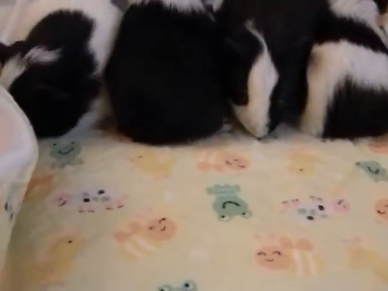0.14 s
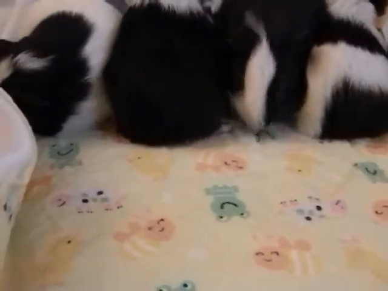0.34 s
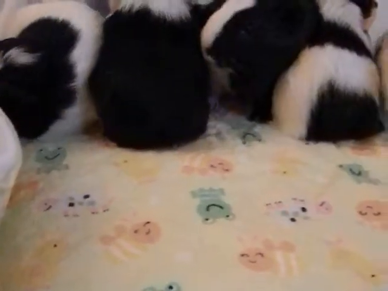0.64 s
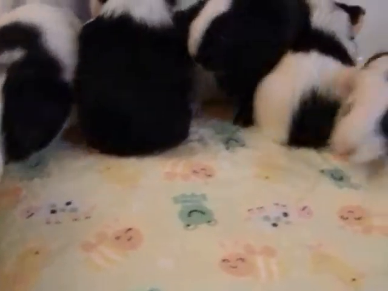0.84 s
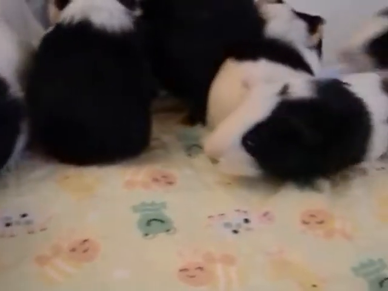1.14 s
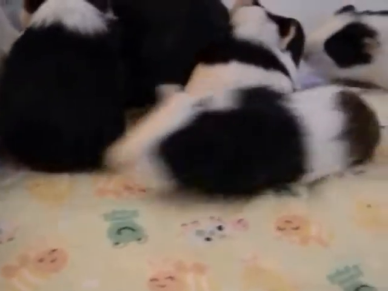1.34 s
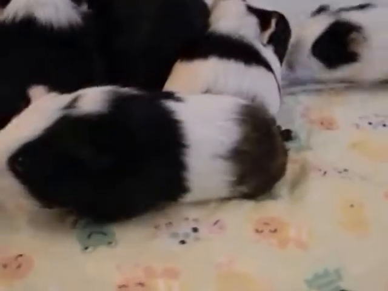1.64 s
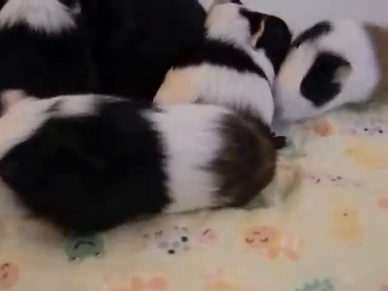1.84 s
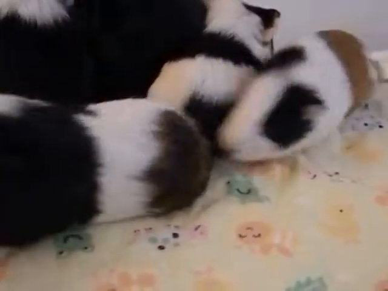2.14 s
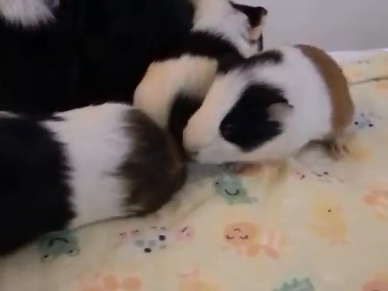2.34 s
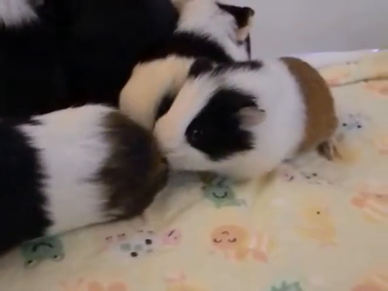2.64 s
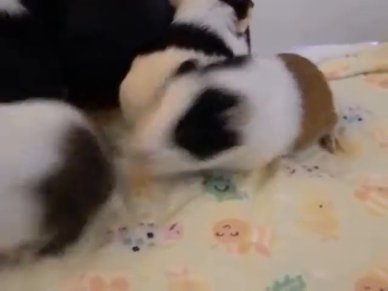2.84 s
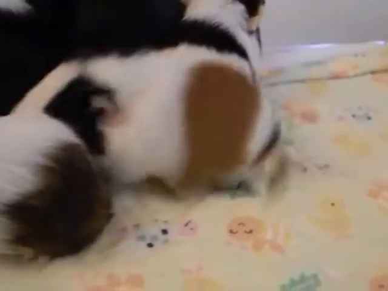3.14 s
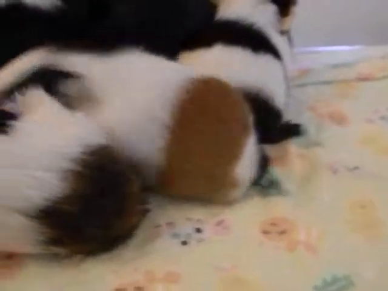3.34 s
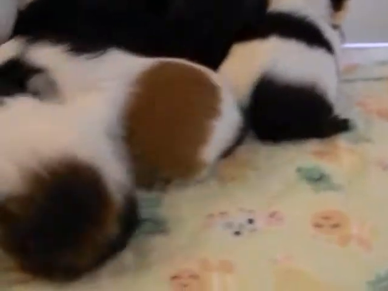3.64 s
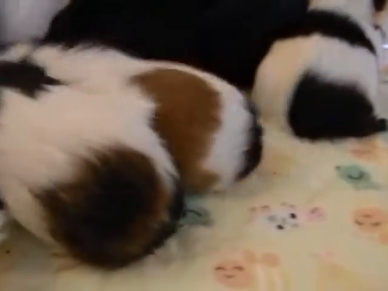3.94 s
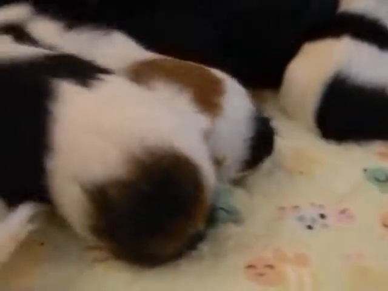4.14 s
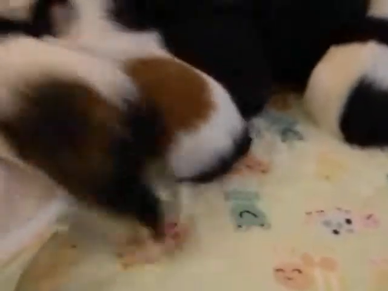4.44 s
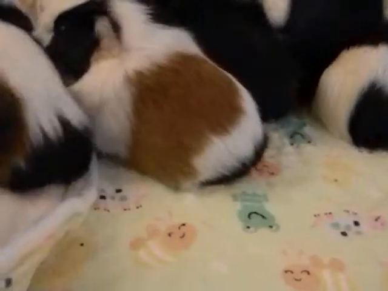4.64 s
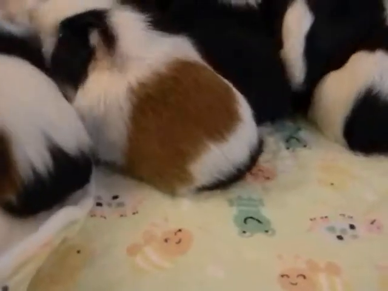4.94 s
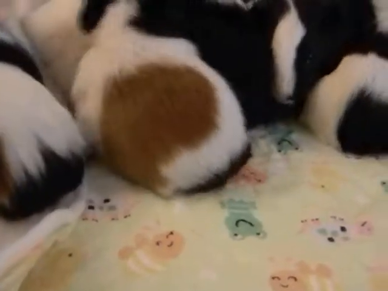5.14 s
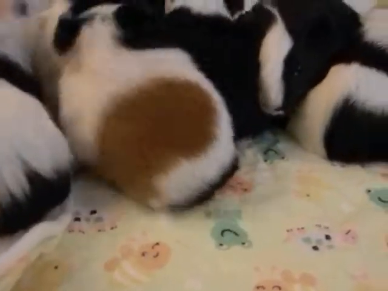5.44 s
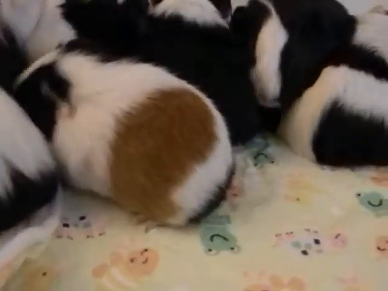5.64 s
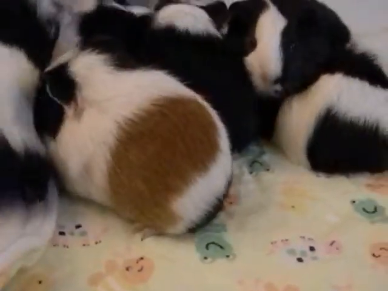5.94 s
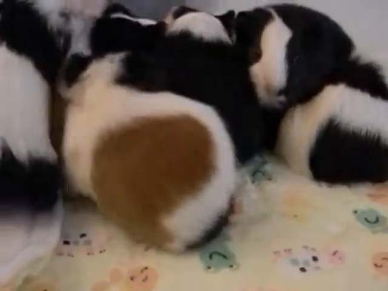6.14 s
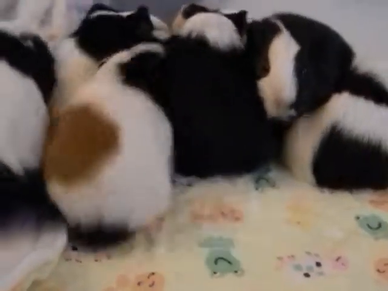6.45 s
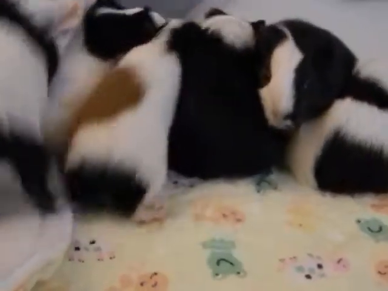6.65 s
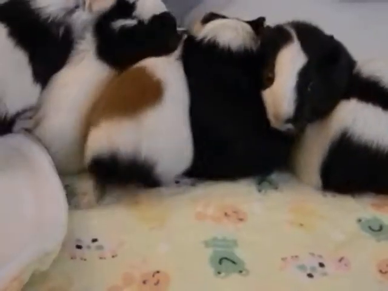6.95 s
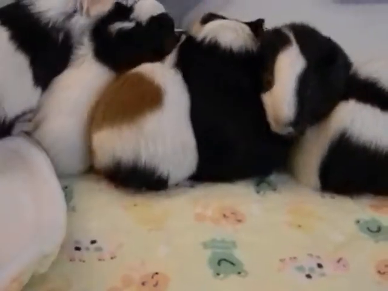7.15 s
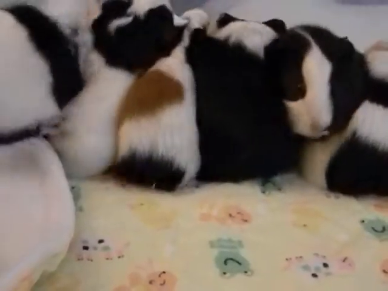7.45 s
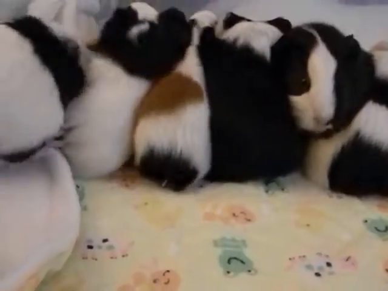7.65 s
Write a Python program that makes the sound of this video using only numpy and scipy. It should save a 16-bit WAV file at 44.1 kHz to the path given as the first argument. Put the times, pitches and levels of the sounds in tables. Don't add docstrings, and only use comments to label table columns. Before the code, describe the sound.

Several young guinea pigs call at once, very near a stereo microphone in a quiet, dry room. Short curved low squeaks overlap quickly, with bright whistles leaping above them. Around two seconds, louder wheeks start low and break upward. Hoarse chuttering from the rest of the litter fills the gaps. Later the calls grow sparser, and rough grumbles, claw ticks, soft foot thuds and fur rustling come forward over a faint rumble.

```python
import sys
import numpy as np
from scipy import signal
from scipy.fft import rfft, irfft, next_fast_len
from scipy.io import wavfile
from scipy.ndimage import uniform_filter1d

SR = 44100
rng = np.random.default_rng(int(sys.argv[2]) if len(sys.argv) > 2 else 0)


def unload_wav(signal):
    wavfile.write(
        sys.argv[1],
        SR,
        np.round(np.clip(np.atleast_2d(signal).T, -1, 1) * 32767).astype(np.int16),
    )


def volts_from_db(level):
    exponent = np.asarray(level, float) / 20
    return 10 ** exponent


N = 343539

# (frequency [Hz], level [dB])
HOARSE_AIR = [(300, -35), (400, 8), (700, -1), (1500, -6), (2400, -6), (4300, -21), (4900, -28.5),
              (5800, -57)]


def near_pups(breath_db=-25.0):
    out = np.zeros(N)
    for rows, overtones_db in calls():
        add(out, *voice(rows, overtones_db, jitter_hz=11.65, shimmer_db=1.5, edge_s=.002))
    low_part = colour(out, [(1500, 3.0), (2500, -45)])
    effort = np.sqrt(abs(uniform_filter1d(low_part ** 2, 200)))
    return out + volts_from_db(breath_db) * effort * evened(colour(rng.standard_normal(N), HOARSE_AIR))


# (time [s], pitch [Hz], level [dB])
WHEEK_LINES = [
    [(1.7, 994, -33), (1.714, 586.6, -22.5), (1.76, 510.5, -18.5), (1.806, 687, -19.5), (1.824, 1397, -25),
     (1.84, 2186, -31.5), (1.857, 2940, -30), (1.888, 3520, -27), (1.935, 3740, -23.5), (1.95, 4080, -20.5)],
    [(2.02, 584, -19.5), (2.072, 530, -14), (2.108, 609, -19.5), (2.149, 775, -26.5), (2.168, 1140, -25.5),
     (2.194, 1321, -24.5), (2.21, 1790, -37)],
    [(2.285, 678, -22), (2.336, 491, -17.5), (2.386, 691, -25), (2.408, 1125, -24.5), (2.433, 2160, -35.5),
     (2.474, 2915, -30), (2.525, 3025, -35), (2.538, 3600, -30.5)],
    [(2.62, 625.6, -20.5), (2.666, 518.4, -16.5), (2.706, 652, -20), (2.75, 858, -27), (2.774, 1570, -32.5),
     (2.804, 2370, -33), (2.838, 2527, -27)],
]
# (time [s], pitch [Hz], level [dB])
ARCH_LINES = [
    [(4.138, 1625, -40), (4.15, 2860, -37), (4.17, 3247, -48.5), (4.19, 2950, -33.5), (4.2, 2620, -40),
     (4.226, 2595, -31.5), (4.24, 2950, -50), (4.254, 2820, -34), (4.26, 2380, -43)],
    [(4.44, 1920, -38), (4.455, 2930, -41.5), (4.51, 3824, -31.5), (4.545, 3020, -36.5), (4.555, 1120, -25)],
    [(.668, 2445, -43), (.69, 2900, -43), (.71, 3010, -42.5), (.738, 2540, -39)],
    [(1.225, 2460, -38), (1.255, 2600, -35.5), (1.27, 3045, -34.5), (1.315, 2986, -36), (1.327, 2500, -39)],
    [(3.468, 1121, -36.5), (3.487, 2695, -41.5), (3.53, 2567, -38), (3.552, 2040, -42)],
    [(3.888, 1495, -35.5), (3.905, 1930, -41), (3.925, 2760, -44), (3.943, 3000, -42.5)],
]
# (time [s], pitch [Hz], level [dB])
CLIMB_LINES = [
    [(.07, 1002, -40), (.088, 2216, -40), (.105, 3020, -36.5), (.13, 3720, -29), (.15, 3891, -27),
     (.175, 3930, -30)],
    [(.383, 904, -31), (.398, 2580, -37), (.425, 3500, -33.5), (.45, 3955, -24), (.476, 4030, -30),
     (.485, 3760, -32.5)],
    [(.925, 2115, -31), (.945, 3130, -39), (.97, 3743, -25.5), (1.0, 3990, -30)],
    [(1.295, 1280, -25), (1.335, 2300, -41), (1.37, 2900, -32.5), (1.392, 3610, -38)],
    [(6.85, 3050, -40.5), (6.888, 3300, -38), (6.912, 3980, -29.5), (6.925, 4000, -38)],
    [(7.29, 1308, -36), (7.31, 3064, -36.5), (7.328, 3834, -32), (7.365, 4270, -31.5), (7.39, 4180, -29),
     (7.412, 4530, -34), (7.419, 4360, -27.5)],
    [(7.695, 2780, -41), (7.72, 2640, -30.5), (7.742, 1967, -39)],
]
# (time [s], pitch [Hz], level [dB])
SHRIEK_LINES = [
    [(3.2, 3110, -40), (3.23, 2978, -46), (3.255, 2580, -36), (3.275, 2340, -37), (3.286, 2000, -47)],
    [(3.355, 1811, -51), (3.372, 2335, -42.5), (3.39, 2770, -32.5), (3.41, 3080, -43), (3.437, 3331, -38)],
]


def calls():
    out = low_calls() + whistles() + slides()
    for lines, overtones_db in ((WHEEK_LINES, -13), (ARCH_LINES, -15.5), (CLIMB_LINES, -22.5), (SHRIEK_LINES, -8.5)):
        out += [(line, overtones_db) for line in lines]
    return out


# (start time [s], length [s], lowest pitch [Hz], level [dB], end pitch [Hz])
DIP_CALLS = [(.3, 0.0757, 549.9, -23, 598), (.82, 0.097, 538.8, -23.5, 607),
             (1.61, 0.078, 543.9, -28.5, 1030), (1.87, 0.061, 524, -26.5, 550),
             (2.41, 0.067, 774.3, -28, 1360), (2.555, 0.082, 552, -22.5, 601.6),
             (3.07, 0.065, 568.8, -24.5, 537), (3.165, 0.11, 554.3, -20.5, 708),
             (3.71, 0.064, 481, -34, 477), (3.78, 0.098, 578, -22.5, 779.7), (4.92, 0.05, 532, -31, 561),
             (5.02, 0.013, 634, -28, 637), (6.3, 0.061, 497.4, -24, 601.4), (7.03, 0.074, 678, -26, 706)]
# (start time [s], length [s], lowest pitch [Hz], level [dB], end pitch [Hz])
SAG_CALLS = [(0, 0.083, 531, -24, 722.2), (.14, 0.1, 492, -25.5, 623), (.44, 0.048, 760, -29.5, 719),
             (.53, 0.052, 492, -27.5, 613), (.69, 0.041, 561, -30.5, 570), (.9, 0.12, 569.4, -25, 788.4),
             (1.12, 0.1645, 510.3, -23, 595.5), (1.438, 0.076, 533.5, -27.5, 553.8),
             (2.845, 0.12, 532.4, -22.5, 552), (2.92, 0.1298, 528, -19.5, 1066),
             (3.37, 0.1, 475.4, -23.5, 681.4), (3.94, 0.1, 555, -32.5, 545),
             (4.055, 0.061, 563.2, -20, 536), (4.3, 0.073, 568, -24, 574), (4.365, 0.064, 555.3, -25, 544),
             (4.552, 0.027, 772, -24.5, 700), (4.695, 0.047, 562, -24, 555),
             (5.365, 0.15, 534.1, -22, 1042), (5.595, 0.12, 559.5, -22, 700.6),
             (1.17, 0.031, 585.2, -20, 558), (5.84, 0.077, 578, -24, 610), (6.1, 0.081, 542, -27.5, 761.5),
             (5.175, 0.073, 473, -27, 760), (6.53, 0.0358, 492, -26.5, 478),
             (7.66, 0.0602, 517.4, -27.5, 683)]
# (start time [s], length [s], first pitch [Hz], level [dB], end pitch [Hz])
GLIDE_CALLS = [(.085, 0.046, 634.3, -28, 700), (.58, 0.0652, 527, -21.5, 644),
               (1.07, 0.0536, 504, -26, 607), (4.185, 0.024, 825, -25.5, 557), (4.84, 0.024, 592, -32, 650),
               (5.06, 0.0496, 610, -28.5, 568), (6.06, 0.03, 495, -29.5, 840), (5.14, 0.031, 680, -40, 810),
               (3.9, 0.028, 700, -31, 780), (8.1, .016, 1000, -30, 650), (7.59, 0.0313, 570, -30, 640),
               (7.445, .03, 890, -36.5, 890), (6.73, 0.0324, 780, -32, 860), (7.4, .018, 1400, -36, 1600),
               (2.465, 0.04, 599, -27.5, 590), (2.68, 0.0345, 599, -22.5, 640),
               (6.665, 0.0585, 594, -25, 750), (4.75, 0.04, 370, -35, 420), (4.9, 0.051, 550, -31, 950),
               (7.52, 0.079, 615, -28.5, 650)]
# (start time [s], length [s], lowest pitch [Hz], level [dB], end pitch [Hz])
CRACK_CALLS = [
    (1.48, .125, 533, -22.5, 1776),
    (3.545, 0.11, 544, -19, 1970),
]


def low_calls():
    bent = dict(lead=1.55, settle_s=.015, late=3.6, overtones_db=-15)
    sagging = dict(lead=1.15, settle_s=.025, late=3.2, overtones_db=-15)
    straight = dict(lead=1, settle_s=.01, late=1.1, overtones_db=-15.5)
    cracking = dict(lead=1.13, settle_s=.03, late=9, overtones_db=-14)
    kinds = ((DIP_CALLS, bent), (SAG_CALLS, sagging), (GLIDE_CALLS, straight), (CRACK_CALLS, cracking))
    return [low_call(*row, **kind) for table, kind in kinds for row in table]


def low_call(start, length, low, db, end, lead, settle_s, late, overtones_db):
    close_db, off_pitch_db = 2.5, -9.5
    u = np.linspace(0, 1, 16)
    settling = np.log2(lead) * np.exp(-u * length / settle_s)
    turning = np.log2(end / low) * u ** late
    octaves = settling + turning
    level_db = db + close_db + off_pitch_db * np.minimum(abs(octaves), .8)
    return np.transpose([start + u * length, low * 2 ** octaves, level_db]), overtones_db


# (start time [s], length [s], first pitch [Hz], top pitch [Hz], level [dB])
LEVELLING_WHISTLES = [
    (2.648, 0.102, 1906, 4051, -25),
]


def whistles(climb=.23, swell_db=-12.5, overtones_db=-22.5):
    out = []
    u = np.linspace(0, 1, 16)
    left = np.exp(-u / climb)
    for start, length, first, top, db in LEVELLING_WHISTLES:
        line = np.transpose([start + u * length, top - (top - first) * left, db + swell_db * left])
        out.append((line, overtones_db))
    return out


# (start time [s], length [s], first pitch [Hz], end pitch [Hz], level [dB])
THIN_SLIDES = [(1.4, 0.014, 1445, 1950, -24.5), (2.747, 0.0088, 4060, 3060, -20.5),
               (3.438, 0.024, 3290, 4180, -26.5), (3.455, 0.0124, 3607, 3400, -38),
               (6.383, 0.0162, 2160, 2790, -38), (7.317, 0.032, 3340, 2960, -41),
               (6.208, 0.047, 3250, 2588, -39.5), (6.232, 0.029, 4260, 3890, -40),
               (6.275, 0.0244, 3543, 4200, -39), (6.374, 0.13, 2800, 3180, -44),
               (3.352, 0.028, 4200, 5430, -41), (4.79, 0.03, 1456, 1400, -33)]
# (start time [s], length [s], first pitch [Hz], end pitch [Hz], level [dB])
BRIGHT_SQUEALS = [
    (0, 0.038, 2768, 2900, -34),
    (.38, 0.027, 2263, 2975, -35),
]


def slides(growth_db=-5):
    out = []
    for table, overtones_db in ((THIN_SLIDES, -22), (BRIGHT_SQUEALS, -7.5)):
        for start, length, first, end, db in table:
            line = [(start, first, db + growth_db), (start + length, end, db)]
            out.append((line, overtones_db))
    return out


# (frequency [Hz], level [dB])
THROAT_COLOUR = [(850, 5.5), (1130, 0), (1700, 1), (2700, -2.5), (4200, 3.5), (5400, -6), (6600, -31.5),
                 (9000, -6), (14000, -23)]
# (pitch [Hz], share of the overtone slope [0-1])
BREAK_SLOPE = [(700, .7), (1300, .7), (2100, .4), (2900, .75), (3800, .95)]
# (frequency [Hz], level [dB])
SHUT_MOUTH_COLOUR = [(4400, -2.1), (4800, -14.5), (9000, -9)]
# (call start time [s], lowest overtones level [dB], higher overtones level [dB])
MOUTH_OPENINGS = [(.14, 7.5, -0.5), (.44, 0, -7), (.53, 5, 2), (.9, 3, -1), (1.438, 6, 0), (1.48, 6, -2),
                  (1.61, 4.5, -9), (1.7, 5, -7), (2.02, 4, -0.5), (2.285, 5, -2), (2.62, 3.5, 0),
                  (3.545, 2, -5), (3.78, 2, -0.5), (4.365, 3, -0.5), (5.06, 6, -7.5), (5.175, -1, -5.5),
                  (5.365, 2, -6), (5.595, 2.5, 1), (5.84, 3, -1), (6.1, 1, -9), (6.3, 6, -14),
                  (7.52, 10, 5.5), (7.66, 4, -2), (3.355, 6, -12), (3.2, -1.5, -5), (1.4, -9, -6),
                  (1.295, -7, -10), (6.375, 8, 1.5), (7.29, 5.5, -2), (.383, 2.5, 1), (1.225, 5.5, 1)]


def voice(rows, overtones_db, jitter_hz, shimmer_db, edge_s):
    s, hz, db = np.transpose(rows)
    t = np.arange(s[0] - edge_s, s[-1] + edge_s, 1 / SR)
    from_edge = np.minimum(t - t[0], t[-1] - t)
    bend = round(0.01047 * SR)
    pitch = np.exp(uniform_filter1d(np.interp(t, s, np.log(hz)), bend, mode="nearest"))
    unsettled = 1 + 3.96 * np.exp(-from_edge / 0.01214) * (pitch < 1300)
    pitch = pitch + jitter_hz * unsettled * wobble(len(t), 259.9)
    pitch = np.maximum(pitch, 100)
    turn = 2 * np.pi * np.cumsum(pitch) / SR
    slow = pitch[::32]
    slope_db = overtones_db * read(BREAK_SLOPE, slow)
    starts_low = hz.min() < 1200
    low_db, high_db = next((row[1:] for row in MOUTH_OPENINGS if abs(row[0] - s[0]) < .008), (0, -2))
    shut = np.clip((1700 - slow) / 500, 0, 1)
    thinning = np.clip((slow - 750) / 400, 0, starts_low)
    out = np.sin(turn)
    for k in range(2, min(10, int(15600 / slow.min()) + 1)):
        partial = k * slow
        level_db = slope_db * np.log2(k) + read(THROAT_COLOUR, partial) + 3.76 * wobble(len(slow), 907)
        highness = min(k / 2 - 1, 1) if starts_low else k > 3
        level_db = level_db + low_db + (high_db - low_db) * highness
        level_db = level_db + read(SHUT_MOUTH_COLOUR, partial) * shut
        level_db = level_db - 8 * thinning * (partial < 3300)
        level_db = level_db + 5 * wobble(len(slow), 6000) * (partial > 4500)
        level = np.interp(t, t[::32], volts_from_db(level_db) * (partial < 15600))
        out += level * np.sin(k * turn + k)
    edge = np.clip(from_edge / (2 * edge_s), 0, 1)
    loudness = volts_from_db(np.interp(t, s, db) + shimmer_db * wobble(len(t), 155.5))
    return t[0], np.sqrt(2) * out * edge * loudness


# (frequency [Hz], level [dB])
STRAIN_HISS = [(3800, -21.5), (4600, -2), (5400, 10.5), (6400, -19)]


def litter(per_s=30, hoarse_db=-7.0):
    chutter = np.zeros(N)
    for start, span, low, rise, fall, db in rng.random((int(per_s * N / SR), 6)):
        s, hz, span = start * N / SR, 440 * (1 + 1.1 * low ** 2), 0.02017 + .07 * span
        first, last = hz * (1 + .35 * fall), hz * (1 + 0.607 * rise)
        rows = [(s, first, -9 * db), (s + span / 2, hz, -9 * db), (s + span, last, -9 * db)]
        add(chutter, *voice(rows, -10.5, jitter_hz=45.5, shimmer_db=3.0, edge_s=.005))
    air = evened(colour(rng.standard_normal(N), HOARSE_AIR)) * volts_from_db(4.4 * wobble(N, 40))
    crowd_db = 10 * np.log10(uniform_filter1d(chutter ** 2, 1800) + 0.043)
    both = evened(chutter / volts_from_db(0.95 * crowd_db)) + volts_from_db(hoarse_db) * air
    low_db, rasp_db = stir()
    low = evened(colour(both, [(1400, -13.5), (3000, -37.5)]))
    rasp = evened(colour(both, [(1400, -22.5), (2500, -21.5)]))
    strain = evened(colour(air, STRAIN_HISS)) * bouts(column=2)
    return strain + low * volts_from_db(low_db + 0.5) + rasp * volts_from_db(rasp_db + 7.0)


# (time [s], chutter level [dB], throat rasp level [dB])
LITTER_EFFORT = [(0, -30, -27), (.15, -26, -58.5), (0.351, -49, -25), (.56, -24, -33), (.72, -34, -37),
                 (.9, -25, -45), (1.151, -30, -33.5), (1.62, -26, -44), (2.1, -32.5, -33),
                 (2.42, -32.5, -36.5), (2.74, -59, -37), (3.0, -27, -38.5), (3.4, -57, -31),
                 (3.7, -28, -41.5), (4.77, -30, -43.5), (5.4, -34, -47), (6.75, -33.5, -37),
                 (7.78, -35.5, -40.5)]
# (time [s], half length [s], depth [dB])
BREATH_LULLS = [(0.457, 0.15, -18.5), (0.832, 0.035, -9), (1.42, 0.037, -10), (1.684, 0.016, -17),
                (1.977, 0.0323, -13), (2.238, 0.047, -13), (2.528, 0.034, -8), (3.213, 0.027, -3),
                (3.501, 0.0264, -8), (3.697, 0.037, -6), (3.956, 0.13, -7.5), (4.23, 0.09, -13.5),
                (4.494, 0.048, -8), (4.64, 0.067, -6), (4.828, 0.052, -9.5), (5.305, 0.063, -9.5),
                (5.547, 0.0238, -7), (5.787, 0.052, -12.5), (6.057, 0.023, -23), (6.216, 0.052, -4.5),
                (6.444, 0.098, -15.5), (7.323, 0.042, -11)]


def stir():
    coarse = np.arange(0, N + 99, 100) / SR
    t = np.arange(N) / SR
    s, low_db, rasp_db = np.transpose(LITTER_EFFORT)
    dips_db = sum(db * np.clip(1 - ((coarse - at) / half) ** 2, 0, 1) for at, half, db in BREATH_LULLS)
    lull_db = np.interp(t, coarse, dips_db)
    return np.interp(t, s, low_db) + lull_db, np.interp(t, s, rasp_db) + lull_db


# (start time [s], length [s], hiss level [dB], fur rise [dB])
SHOVING_BOUTS = [(0, .06, -62, 1), (0.227, .21, -35, 2.5), (.58, 0.234, -42, 1.5), (1.183, 0.24, -47, 4),
                 (1.453, 0.108, -59, 5.5), (1.81, 0.085, -37, 8), (2.385, 0.092, -40, 5),
                 (2.728, 0.049, -61, 8), (3.323, 0.11, -46.5, 1), (4.08, 0.25, -62, 3),
                 (4.396, 0.194, -63.5, 6.5), (6.516, 0.05, -65, 1.5), (6.62, 0.095, -49, 2.5),
                 (6.793, 0.095, -44.5, 3), (7.279, 0.11, -51, 3), (7.462, 0.82, -41, 1)]


def bouts(column):
    out = np.zeros(N)
    for row in SHOVING_BOUTS:
        arch = np.sin(np.pi * np.linspace(0, 1, int(row[1] * SR))) ** .5
        add(out, row[0], arch * (volts_from_db(row[2]) if column == 2 else row[3]))
    return out


# (start time [s], length [s], level [dB])
GRUMBLE_TIMES = [(0.228, 0.044, -42), (0.629, 0.19, -39), (1.045, 0.049, -37), (4.538, .028, -29.5),
                 (4.753, 0.0322, -31), (4.9, 0.096, -48), (5.017, 0.019, -39.5), (5.075, 0.027, -37),
                 (5.912, 0.117, -41), (6.53, .07, -39), (6.608, 0.14, -31.5), (6.788, 0.091, -32),
                 (6.91, 0.22, -37), (7.127, 0.16, -36), (7.43, 0.263, -36.5), (7.65, 0.17, -33.5)]
# (frequency [Hz], level [dB])
GRUFF_THROAT = [(350, -17), (600, -2), (1500, 0.5), (2500, -5.5), (3000, -27.5), (3900, -1.5), (4350, -19),
                (4700, -50)]


def grumbles(per_s=290, unevenness=.45):
    turns = np.cumsum(np.ones(N) + unevenness * np.tanh(wobble(N, 300))) / SR
    size, puff, out = volts_from_db(2.7 * wobble(N, 250)), rng.standard_normal(N), np.zeros(N)
    for start, length, db in GRUMBLE_TIMES:
        span = slice(round(start * SR), min(round((start + length) * SR), N))
        phase = turns[span] * per_s % 1
        beat = evened(np.exp(-phase / .03)) + .6 * np.exp(-phase / .3) * puff[span]
        arch = np.sin(np.pi * np.linspace(0, 1, len(phase))) ** 0.32
        add(out, start, volts_from_db(db + 7.0) * arch * size[span] * beat)
    return colour(out, GRUFF_THROAT)


# (time [s], peak level [dB], ring frequency [Hz], snap level [dB])
CLAW_TICKS = [(1.492, -17, 600, -23), (4.549, -17.5, 1530, -16), (4.879, -36, 2500, -22),
              (5.32, -21.5, 590, -25), (5.785, -22, 605, -38), (5.812, -23.5, 820, -37),
              (6.096, -22, 692, -29), (6.642, -15.5, 646, -22), (6.823, -16.5, 1580, -38),
              (7.461, -24.5, 815.4, -11.5), (4.13, -36, 900, -17), (4.42, -33, 900, -10),
              (4.45, -39, 900, -17), (7.575, -32.5, 900, -16), (7.708, -26, 895, -12), (7.73, -29, 900, -7),
              (6.459, -23, 630, -38), (6.539, -12, 600, -35)]


def claws():
    out, t = np.zeros(N), np.arange(400) / SR
    decay = np.exp(-t / 0.0012)
    for s, db, hz, snap_db in CLAW_TICKS:
        ring = np.sin(2 * np.pi * hz * t) * decay
        snap = np.diff(uniform_filter1d(rng.standard_normal(401), size=3)) * decay
        add(out, s + 0.00098, volts_from_db(db + 9.0) * (ring + volts_from_db(snap_db) * snap))
    return out


# (time [s], peak level [dB], swing frequency [Hz])
FOOT_THUDS = [(1.043, -30, 174), (2.304, -25.5, 109.2), (3.922, -28, 210), (4.15, -25, 133),
              (4.641, -29.5, 158), (6.454, -15.5, 167.8), (6.888, -29.5, 170.6), (1.477, -39, 86),
              (4.46, -33.5, 85), (5.091, -39, 189), (5.145, -36.5, 113), (5.521, -36, 150),
              (6.58, -34, 216), (6.63, -34, 80)]


def feet():
    out, t = np.zeros(N), np.arange(3000) / SR
    for s, db, hz in FOOT_THUDS:
        stiffened = t + 0.00076 * (1 - np.exp(-t / 0.0037))
        swing = -np.sin(2 * np.pi * hz * stiffened)
        add(out, s + 0.00335, volts_from_db(db + 2.5) * swing * np.exp(-1.1 * hz * t))
    return out


# (frequency [Hz], level [dB])
FUR_ON_CLOTH = [(4000, 5), (6000, -1), (9000, -1), (12500, -8.5), (15500, -7.5)]


def rustle():
    hiss = rng.standard_normal(N) * volts_from_db(0.98 * wobble(N, 120))
    return evened(colour(hiss, FUR_ON_CLOTH)) * volts_from_db(0.26 * stir()[1] - 41.5 + bouts(column=3))


# (frequency [Hz], level per Hz [dB])
ROOM_COLOUR = [(18, -51.5), (30, -30), (86, 0), (146, -1.5), (204, -3), (300, -9), (390, 1), (660, -120)]
# (time [s], rumble level [dB])
BODY_RUMBLE = [(0, -52.5), (1.3, -49), (2.6, -49), (4.399, -46.5), (5.6, -52.5), (6.62, -47.5)]


def room_tone():
    a, b = rng.standard_normal((2, N))
    pair = colour(np.array([a, 0.63 * a + 0.77 * b]), ROOM_COLOUR)
    level_db = np.interp(np.arange(N) / SR, *np.transpose(BODY_RUMBLE))
    return volts_from_db(level_db + 2.2 * wobble(N, 10)) * evened(pair)


def pen(x, t60=0.0052, wet_db=-8.0):
    t = np.arange(6000) / SR
    tail = rng.standard_normal(6000) * volts_from_db(-60 * t / t60) * (t > .002)
    return x + volts_from_db(wet_db) * signal.fftconvolve(x, tail / np.linalg.norm(tail))[:N]


# (frequency [Hz], lag of the left [rad], left over right [dB], likeness [0-1])
PORT_PAIR = [(300, 3.2, 3.5, .92), (520, 2.64, 6, .97), (860, 2.45, 4.8, .92), (1700, 1.96, 2.7, .82),
             (3000, 1.6, 1.9, .72), (3900, 1.1, 2.2, .8), (7800, .9, .8, .45), (12500, 0, 0, .5)]


def ports(x, echo_s, loose):
    size = next_fast_len(N)
    hz = np.fft.rfftfreq(size, 1 / SR)
    echo = rng.standard_normal(9000) * np.exp(-np.arange(9000) / SR / echo_s)
    other = rfft(echo, size)
    other = other / np.sqrt(abs(uniform_filter1d(abs(other) ** 2, size=600)))
    same = np.clip(read(PORT_PAIR, hz, column=3), 0, 1) ** loose
    turned = same * np.exp(1j * read(PORT_PAIR, hz, column=1)) + np.sqrt(1 - same ** 2) * other
    turned = turned / np.sqrt(abs(uniform_filter1d(abs(turned) ** 2, size=3000)))
    right = irfft(rfft(x, size) * turned / volts_from_db(read(PORT_PAIR, hz, column=2)), size)[:N]
    return np.array([x, right])


def evened(x):
    return x / np.sqrt(np.mean(x ** 2) + 1e-20)


def read(points, hz, column=1):
    rows = np.transpose(points)
    return np.interp(np.log(hz + 1), np.log(rows[0] + 1), rows[column])


def colour(x, points):
    size = next_fast_len(x.shape[-1])
    gain = volts_from_db(read(points, np.fft.rfftfreq(size, 1 / SR)))
    return irfft(rfft(x, size) * gain, size)[..., :x.shape[-1]]


def wobble(length, hz):
    knots = rng.standard_normal(int(length * hz / SR) + 3)
    return np.interp(np.arange(length) * hz / SR, np.arange(len(knots)), knots)


def add(mix, s, sound):
    part = mix[max(round(s * SR), 0):][:len(sound)]
    part += sound[:len(part)]


# (time [s], gain at the right port [dB])
HEAP_DRIFT = [(0, 2), (1, 1.5), (2.5, -0.9), (4, 1.58), (4.7, 0.5), (5.6, 0.2), (6.6, 1.1), (7.79, 1.23)]


def scene():
    pups = near_pups()
    hush_db, hush_share = -26, .3
    loudness = abs(uniform_filter1d(pups ** 2, size=900))
    hush = (1 + loudness / volts_from_db(2 * hush_db)) ** -hush_share
    near = ports(pen(pups) + claws(), echo_s=.007, loose=.8)
    heap = ports(hush * (litter() + grumbles()) + np.sqrt(hush) * rustle(), echo_s=.045, loose=1.3)
    right_db = np.interp(np.arange(N) / SR, *np.transpose(HEAP_DRIFT))
    drift = volts_from_db(np.outer([0, 1], right_db))
    low = room_tone() + colour(feet(), [(30, -22), (70, -0.5)])
    low = low * volts_from_db(np.array([[1.5], [-1.7]]))
    return colour((near + heap) * drift, [(270, -22), (370, 0)]) + low


def top_cut(x):
    return signal.sosfilt(signal.butter(12, 16830, fs=SR, output="sos"), x)


def record(dry):
    mix = colour(dry, [(25, 1.0), (70, -1.0), (15780, -1.5), (15850, -60.0)])
    return top_cut(mix)


dry = scene()
out = record(dry)
unload_wav(out)
```